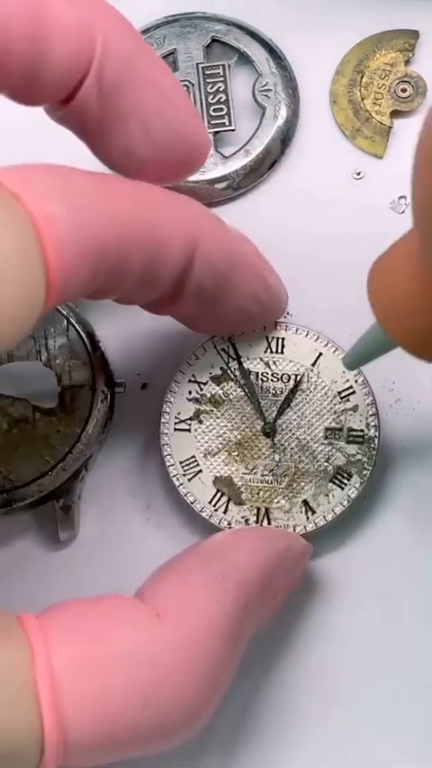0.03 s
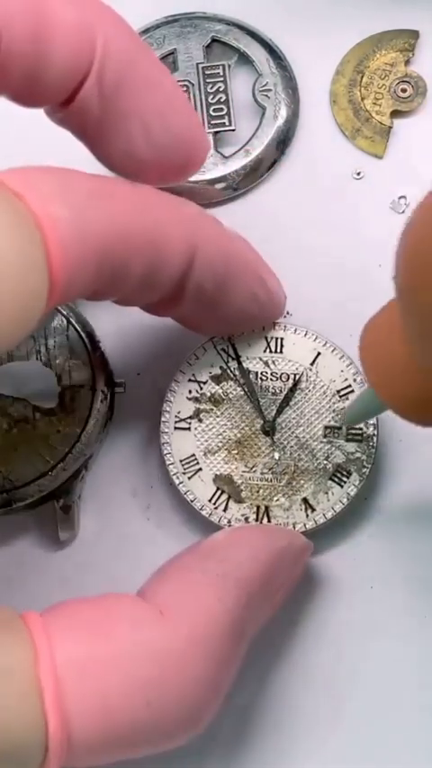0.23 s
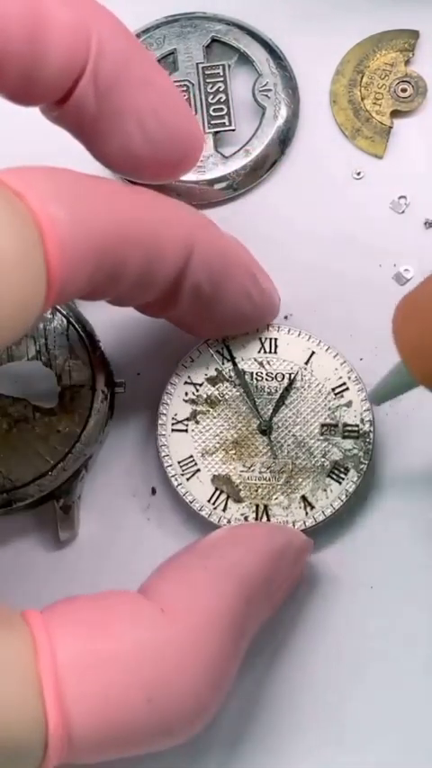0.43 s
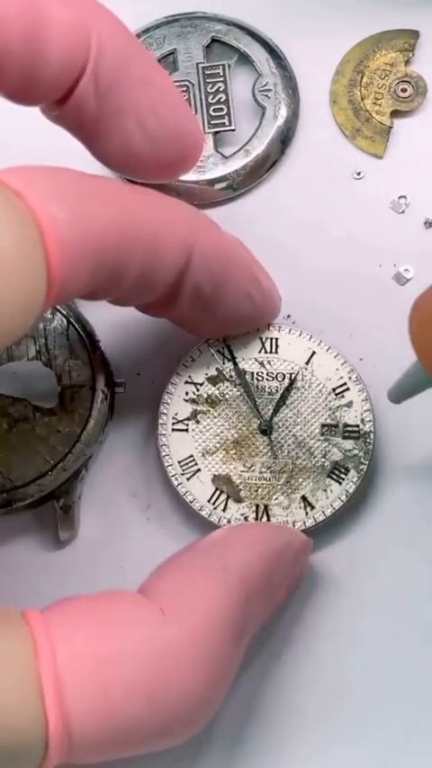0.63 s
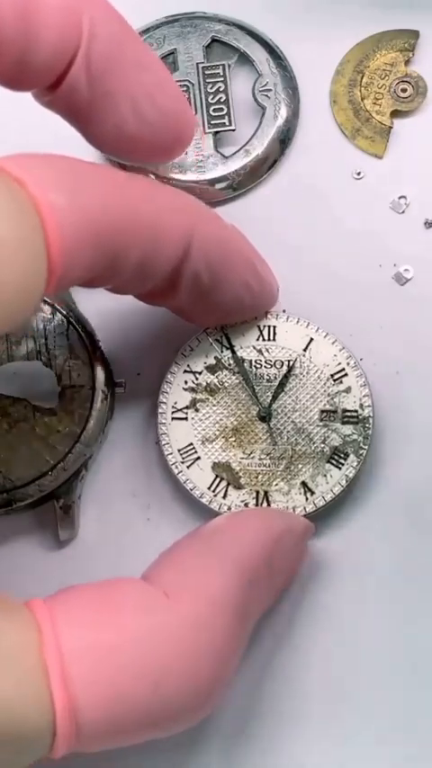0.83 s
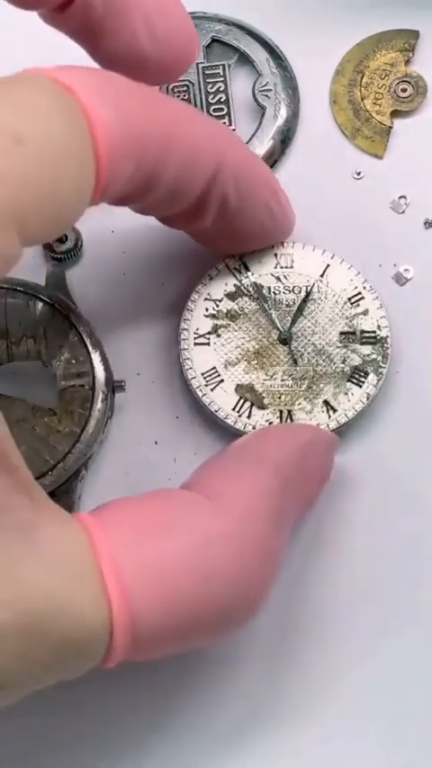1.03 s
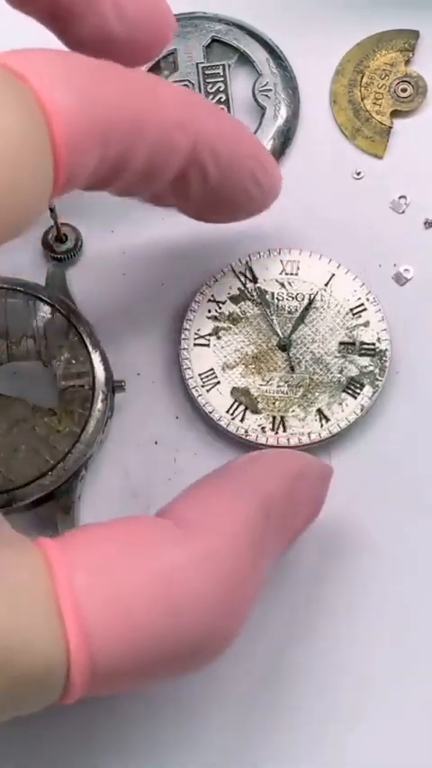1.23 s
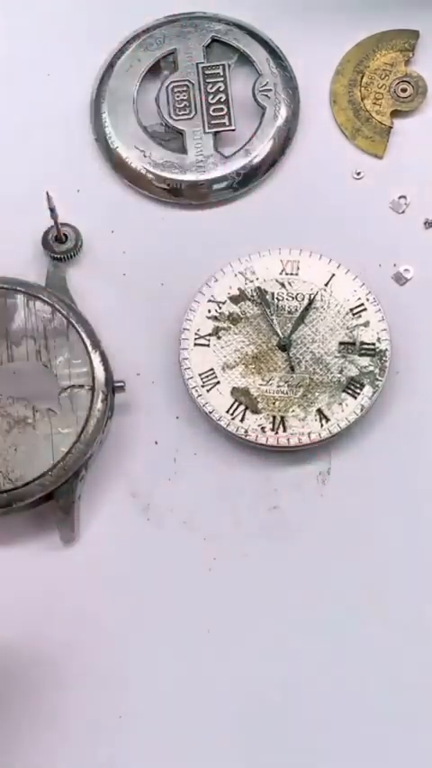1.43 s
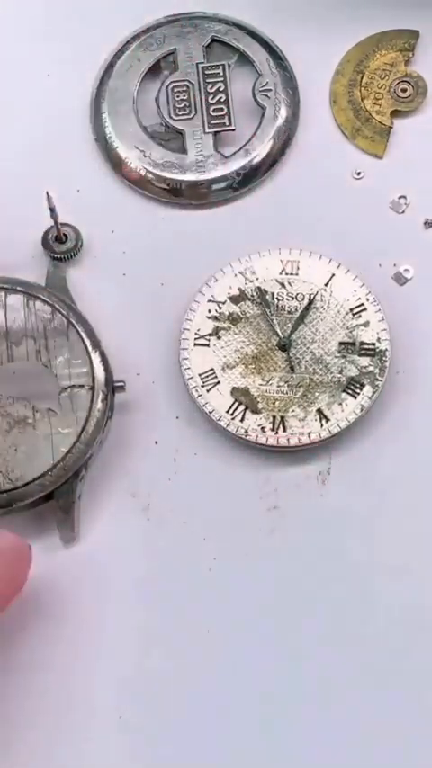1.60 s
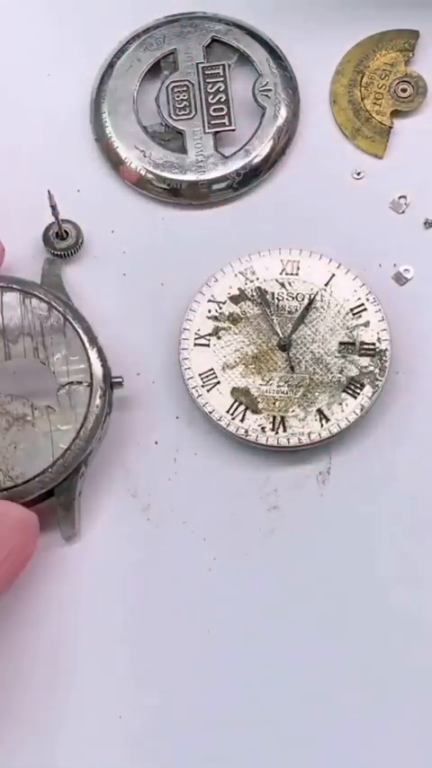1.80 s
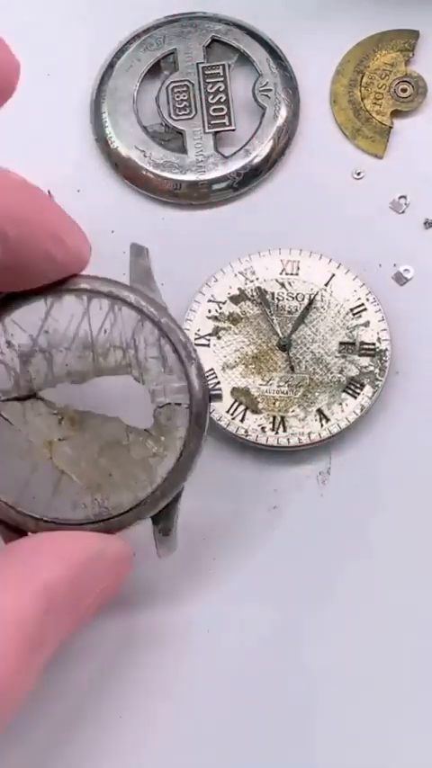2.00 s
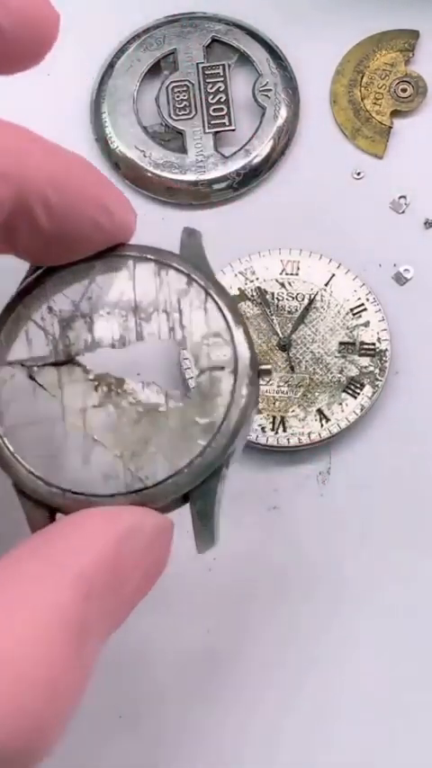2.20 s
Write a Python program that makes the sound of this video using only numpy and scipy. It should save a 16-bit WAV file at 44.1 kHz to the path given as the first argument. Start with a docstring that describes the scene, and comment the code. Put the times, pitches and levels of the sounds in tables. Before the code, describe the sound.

Six quick, hissing puffs from a rubber air blower up close, followed by dull knocks.

```python
"""A rubber hand blower puffs six times at a watch dial, close up on a work surface.
Each squeeze drives a jet of air onto the dial, the harder ones with a sharp nozzle hiss;
after each the bulb flops back and refills through its whistling valve. Then the hand bumps
the bench, the blower is set down with a bounce, and the watch case is slid and picked up.
A quiet room hums underneath."""
import sys
import numpy as np
from scipy import signal
from scipy.fft import rfft, irfft
from scipy.io import wavfile

SR = 44100
rng = np.random.default_rng(int(sys.argv[2]) if len(sys.argv) > 2 else 0)


def pcm_store(signal):
    """Save signal as 16-bit PCM."""
    levels = np.round(np.clip(np.atleast_2d(signal), -1, 1) * 32767)
    wavfile.write(sys.argv[1], SR, levels.astype(np.int16).T)


N = 103635
T = np.arange(N) / SR

# Squeezes of the bulb, levels before the surge: start_s, attack_s, hardest_s, end_s, surge_db, rush_db,
# rush_tilt_db_per_octave, hollow_db, hiss_db, whistle_hz, whistle_width_hz, whistle_db, stereo_width
SQUEEZES = [(0.132, 0.036, 0.174, 0.21, 9, -45.5, -1, -59, -56.5, 5284, 171, -56, 1.55),
            (0.265, 0.031, 0.304, 0.35, 8.5, -44.5, -0.2, -53, -50.5, 5250, 500, -53, 0.14),
            (0.403, 0.023, 0.436, 0.4783, 5, -39, -0.1, -45, -60, 4450, 500, -52, 1.1),
            (0.542, 0.022, 0.593, 0.62, 6, -36.5, -0.28, -57.5, -32, 8900, 750, -42.5, 0.97),
            (0.703, .026, 0.737, 0.7898, 9.5, -39.5, 1, -66, -36, 9000, 600, -44.5, .95),
            (0.845, 0.025, 0.879, 0.92, 5, -39.5, -0.5, -52, -31.5, 5300, 900, -42.5, 0.96)]
# In-breaths of the bulb: start_s, end_s, level_db, tilt_db_per_octave, whistle_relative_db, whistle_hz
BREATHS = [(0.206, 0.261, -45, .3, -4.5, 6450), (0.337, 0.399, -46.5, -.3, -1, 6750),
           (0.475, 0.554, -46, 0, -7.5, 6400), (0.618, 0.696, -46, 0, -7.5, 6350),
           (0.783, 0.854, -45.5, 1, -7, 6500), (0.908, 1.002, -52.5, 0, -2, 6620)]
# Dull colour of slides and valve snaps: frequency_hz, level_db
DULL_SPECTRUM = [(100, 1), (280, 4.5), (450, -12), (750, 3), (1100, -2.5), (2000, -8), (3000, -20.5),
                 (8000, -46)]
# Bright colour of scratches and ticks: frequency_hz, level_db
BRIGHT_SPECTRUM = [(1000, -20), (3000, 5.5), (4400, 7), (6500, 9), (9000, 4), (11000, -8)]


def from_db(db):
    """Decibels to gain."""
    return 10 ** (np.asarray(db) / 20)


def at_hz(points):
    """A curve read at every frequency bin, on a log axis."""
    hz, value = np.transpose(points)
    return np.interp(np.log(np.arange(N // 2 + 1) * SR / N + 1), np.log(hz), value)


def noise(spectrum, width=1, tilt_db=0):
    """Coloured stereo noise of rms 1, centred in the bass, diffuse on top; tilt_db is per octave."""
    # How alike left and right sound: frequency_hz, likeness
    stereo_likeness = [(3700, 1.0), (4300, 1), (5000, 0.49), (6300, .42), (8500, 0.4), (9400, 0.09),
                       (10100, 0.62), (11200, .45)]
    alike = np.clip(at_hz(stereo_likeness), -1, 1)
    mid, side = rfft(rng.standard_normal((2, N)))
    stereo = np.sqrt(1 + alike) * mid + width * np.sqrt(1 - alike) * side * [[1], [-1]]
    colour = from_db(at_hz([(hz, db + tilt_db * np.log2(hz)) for hz, db in spectrum]))
    x = irfft(colour * stereo, N)
    return x / x.std()


def lowpass(x, hz):
    """Second-order low-pass."""
    return signal.sosfilt(signal.butter(2, hz, fs=SR, output="sos"), x + 1e-18)


def drift(hz):
    """Random wavering of spread 1."""
    x = lowpass(rng.standard_normal(N), hz)
    return x / x.std()


def whistle(pitch_hz, width_hz):
    """A breathy tone: a band of noise around a pitch."""
    phase = 2 * np.pi * np.cumsum(pitch_hz * np.ones(N)) / SR
    return drift(width_hz / 2) * np.cos(phase) + drift(width_hz / 2) * np.sin(phase)


def gate(start_s, end_s, attack_s, release_s):
    """Smooth rise, hold and fall."""
    rise = np.sin(np.pi / 2 * np.clip((T - start_s) / attack_s, 0, 1))
    fall = np.sin(np.pi / 2 * np.clip((end_s - T) / release_s, 0, 1))
    return rise * fall


def swell(peak_s, half_s):
    """A bell-shaped envelope of height 1."""
    return np.exp(-((T - peak_s) / half_s) ** 2)


def clicks(rows):
    """One impulse for each (time_s, level_db)."""
    out = np.zeros(N)
    for s, db in rows:
        out[int(s * SR)] += from_db(db)
    return out


def dying(x, t60_s):
    """An exponential decay after each impulse."""
    return signal.lfilter([1], [1, -np.exp(-np.log(1000) / (t60_s * SR))], x + 1e-18)


def ring(x, hz, t60_s):
    """A mode that rings with height 1 after a unit click."""
    radius, angle = from_db(-60 / (t60_s * SR)), 2 * np.pi * hz / SR
    return signal.lfilter([0, np.sin(angle)], [1, -2 * radius * np.cos(angle), radius ** 2], x + 1e-18)


def struck(hits, modes):
    """A body that rings in all its modes after each click."""
    return sum(from_db(db) * ring(hits, hz, t60_s) for hz, db, t60_s in modes)


def room():
    """Room tone: low rumble, faint hiss and a wavering hum."""
    # Rumble and hiss: frequency_hz, level_db
    room_spectrum = [(20, -1.5), (45, -3), (69, -5.5), (108, -20.5), (140, -14), (250, -18.5), (434, -23),
                     (700, -26.5), (1100, -27.5), (1750, -34), (3000, -38.5), (6150, -43.5), (10000, -44),
                     (12000, -50.5)]
    # Faint tones of the room: pitch_hz, level_db
    hum_tones = [(77, -73), (297, -83), (440, -85.5), (578, -85), (885, -87)]
    bed = from_db(-65) * noise(room_spectrum, width=.3)
    return bed + sum(from_db(db) * whistle(hz, width_hz=21) for hz, db in hum_tones)


def buffet():
    """Stirred air rumbles on the microphone; each squeeze adds a gust in step with its rush."""
    # Wind rumble: frequency_hz, level_db
    rumble_spectrum = [(15, 2.5), (40, -3.5), (80, -15), (160, -17.5), (400, -35.5)]
    stirred = from_db(-52) * gate(SQUEEZES[0][0], BREATHS[-1][1], attack_s=.012, release_s=.1)
    gusts = sum(from_db(rush_db - 13.5) * swell(hardest_s, half_s=.03)
                for _, _, hardest_s, _, _, rush_db, *_ in SQUEEZES)
    return np.hypot(stirred, gusts) * noise(rumble_spectrum)


def rubs():
    """Hand and watch case slide over the surface: a dull swish with a grainy scratch."""
    # Brief slides: peak_s, half_length_s, swish_db, scratch_db
    slides = [(0.066, 0.017, -73, -85), (1.012, 0.02, -48, -68.5), (1.497, 0.062, -73.5, -78.5),
              (1.737, 0.011, -70, -96), (2.03, 0.032, -70, -82), (2.034, 0.0035, -81, -69),
              (1.09, .02, -78, -77)]
    swish, scratch = 0, 0
    for peak_s, half_s, swish_db, scratch_db in slides:
        stroke = np.exp(-abs(T - peak_s) / half_s)
        swish += stroke * from_db(swish_db)
        scratch += stroke * from_db(scratch_db)
    return swish * noise(DULL_SPECTRUM) + scratch * noise(BRIGHT_SPECTRUM) * from_db(1.6 * drift(hz=500))


def bench_bumps():
    """The hand sets the bench top booming, with a short woody knock above."""
    # Bumps of the hand: time_s, boom_db, knock_db
    bumps = [(1.004, -61, -52), (1.012, -34, -44.5), (1.735, -50, -71)]
    # Low boom of the bench top: pitch_hz, level_db, t60_s
    boom_modes = [(77.5, -1, 0.2), (139, -12.5, 0.064)]
    # Woody knock: pitch_hz, level_db, t60_s
    wood_modes = [(261.6, -6, 0.14), (685, -3, 0.082), (792, -8.5, 0.054), (1038, 0, 0.056),
                  (1640, -11, 0.054), (2020, -10, .06)]
    pushes = clicks([(s, boom_db) for s, boom_db, _ in bumps])
    raps = clicks([(s, knock_db) for s, _, knock_db in bumps])
    return lowpass(struck(-pushes, boom_modes), hz=198) + struck(raps, wood_modes)


def blower_landing():
    """Rubber lands on the surface: dull knocks with short tails, and dry ticks from jolted metal."""
    # The landing and its bounces: time_s, knock_db, tick_db
    bounces = [(1.2234, -30.5, -61), (1.241, -52, -68), (1.2552, -33, -60), (1.274, -44, -75),
               (1.2877, -44, -66.5), (1.3, -52.5, -77)]
    # Body of the knock: pitch_hz, level_db, t60_s
    knock_modes = [(231, -15, 0.047), (543, -10, 0.03), (700, -5, 0.0094), (763, -9, 0.022),
                   (960, -15.5, 0.02)]
    # Noisy tail of the knock: frequency_hz, level_db
    tail_spectrum = [(40, -14), (110, 3), (300, -2), (550, 1.5), (900, -2), (1500, -18), (3000, -32),
                     (4300, -21), (5400, -24), (8800, -23), (10000, -38)]
    # Small metal parts: pitch_hz, level_db, t60_s
    metal_modes = [(4350, -5, .04), (7930, -9, .04), (8910, -6, .05)]
    soft_hz, low_cut_hz = 1400, 300
    hits = clicks([(s, knock_db) for s, knock_db, _ in bounces])
    jolts = clicks([(s, tick_db) for s, _, tick_db in bounces])
    body = lowpass(lowpass(struck(hits, knock_modes), soft_hz), soft_hz)
    body = signal.sosfilt(signal.butter(1, low_cut_hz, "high", fs=SR, output="sos"), body)
    tail = from_db(-22) * dying(hits, t60_s=.12) * noise(tail_spectrum)
    ticks = dying(jolts, t60_s=.024) * noise(BRIGHT_SPECTRUM)
    return body + tail + ticks + struck(jolts, metal_modes)


def bulb():
    """The valve snaps shut at each squeeze, and the rubber flops back at each release."""
    # Soft thud of the rubber: frequency_hz, level_db
    flop_spectrum = [(40, -5), (170, -1), (260, -9.5), (600, -23)]
    closings = clicks([(start_s + .008, -51.5) for start_s, *_ in SQUEEZES])
    snaps = dying(closings, t60_s=.02) * noise(DULL_SPECTRUM)
    flops = sum(swell(start_s + .009, half_s=.01) for start_s, *_ in BREATHS)
    return snaps + from_db(-50.5) * flops * noise(flop_spectrum)


def refill():
    """Air is drawn back through the valve, whose rough whistle rises as the bulb fills."""
    # Air sucked through the valve: frequency_hz, level_db
    intake_spectrum = [(100, -6.5), (500, 0.5), (1100, 2.5), (1600, -1), (2400, -1), (4000, -3),
                       (4800, -5.5), (6000, 2.5), (7700, -0.5), (9000, -5), (11000, -5.5), (12000, -16.5)]
    rise_hz_per_s, width_hz = 7100, 450
    flow, whistle_gain, pitch_hz = 0, 0, 0
    for start_s, end_s, level_db, tilt_db, whistle_db, whistle_hz in BREATHS:
        draw = from_db(level_db) * gate(start_s, end_s, attack_s=.032, release_s=.048)
        flow += draw * noise(intake_spectrum, width=.7, tilt_db=tilt_db)
        whistle_gain += draw * from_db(whistle_db)
        pitch_hz += (whistle_hz + rise_hz_per_s * (T - start_s)) * (T > start_s) * (T < end_s)
    mid = whistle(pitch_hz, width_hz)
    side = .43 * whistle(pitch_hz, width_hz) * [[1], [-1]]
    return flow + whistle_gain * (mid + side)


def jet():
    """Each puff opens, surges and stops; hiss and edge whistle swell more steeply than the rush."""
    # Air rushing over the dial: frequency_hz, level_db
    rush_spectrum = [(100, -13.5), (350, -7), (700, -8), (1100, -4), (1700, -2.5), (2600, -3), (3300, -3.5),
                     (4200, 1), (5300, -1.5), (7000, -2.5), (8600, -5.5), (10000, -12.5), (12000, -16)]
    # Sharp hiss of the nozzle: frequency_hz, level_db
    hiss_spectrum = [(1200, -26), (3200, -16.5), (4200, -6.5), (5200, -4), (6100, 1.5), (7200, -7),
                     (8100, -4.5), (9050, 1), (10000, -7.5), (10800, -4.5), (11700, -9.5), (12600, -22)]
    seep_db, flutter_db = -65, 1.11
    air = 0
    for (start_s, attack_s, hardest_s, end_s, surge_db, rush_db, tilt_db, hollow_db,
         hiss_db, whistle_hz, whistle_width_hz, whistle_db, stereo_width) in SQUEEZES:
        surge = from_db(surge_db * swell(hardest_s, half_s=.014))
        force = gate(start_s, end_s, attack_s, release_s=.016) ** 2 * surge
        rush = noise(rush_spectrum, stereo_width, tilt_db)
        hollow = from_db(hollow_db) * whistle(1599, width_hz=850)  # rings between dial and fingers
        hiss = from_db(hiss_db) * noise(hiss_spectrum, stereo_width)
        edge_tone = from_db(whistle_db) * whistle(whistle_hz, whistle_width_hz)
        air += from_db(seep_db) * swell(start_s + .007, half_s=.007) * rush  # seeps as the grip tightens
        air += force ** .72 * (from_db(rush_db) * rush + hollow)
        air += force * (hiss + edge_tone)
    return air * from_db(flutter_db * drift(hz=148.9))


def reflect(x):
    """Early echoes from the bench and the things on it."""
    # Nearby surfaces: delay_s, level_db
    echoes = [(.0013, -33.5), (.0034, -26.5), (.0062, -20.5), (0.01, -16.5)]
    return x + sum(from_db(db) * np.roll(x, int(s * SR), axis=-1) for s, db in echoes)


def scene():
    """Blower and handling over the quiet room."""
    close_up = jet() + refill() + bulb() + blower_landing() + rubs()
    return reflect(close_up) + buffet() + bench_bumps() + room()


def record(dry):
    """A steep high cut at 11.9 kHz."""
    return signal.sosfilt(signal.ellip(10, .2, 70, 11900, fs=SR, output="sos"), dry)


dry = scene()
out = record(dry)
pcm_store(out)
```